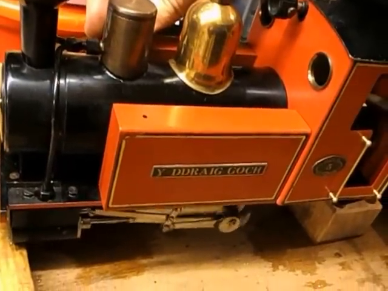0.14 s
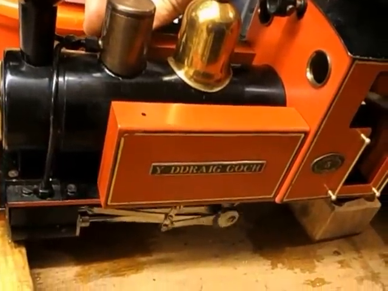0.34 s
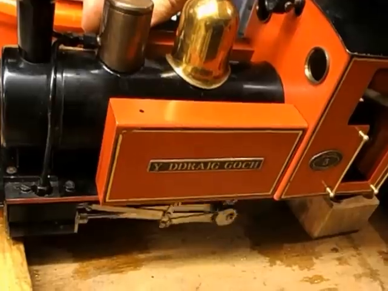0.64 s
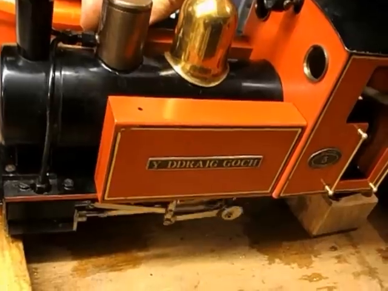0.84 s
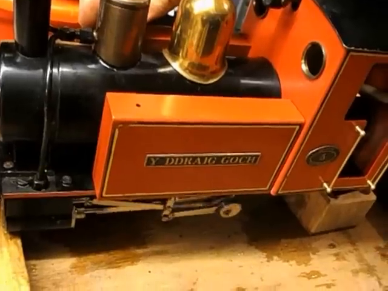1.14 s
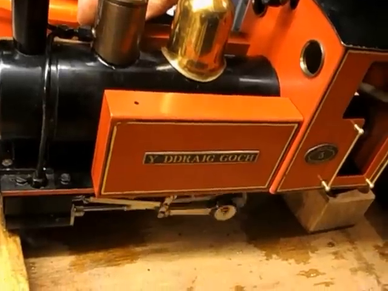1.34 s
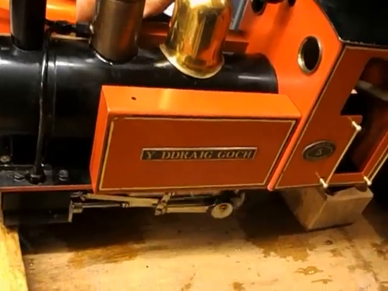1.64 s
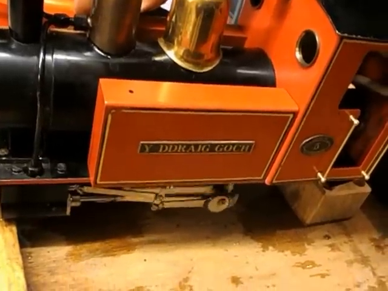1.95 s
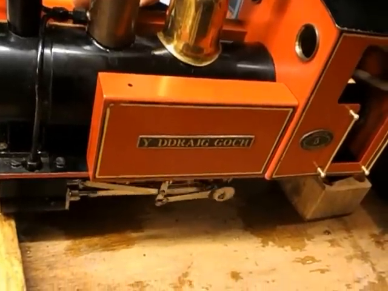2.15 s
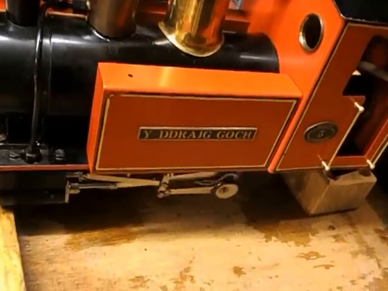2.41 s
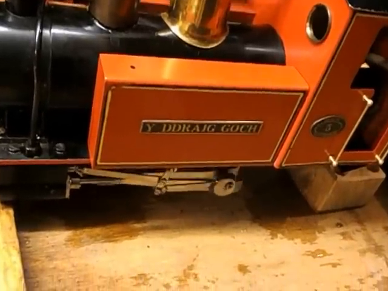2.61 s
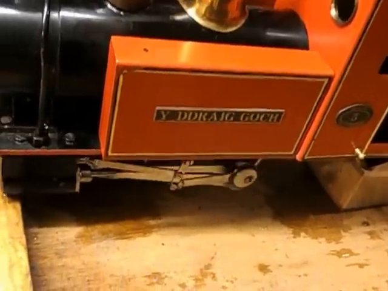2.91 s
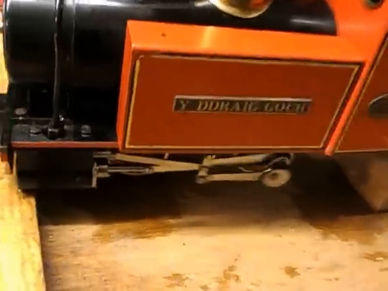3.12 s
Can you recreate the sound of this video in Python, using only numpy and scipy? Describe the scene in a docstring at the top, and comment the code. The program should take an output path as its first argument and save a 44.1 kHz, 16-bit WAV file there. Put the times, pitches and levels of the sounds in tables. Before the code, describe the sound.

Small gas-fired steam engine hissing steadily close up, with light metallic ticks and one hard snap

```python
"""Model steam locomotive at tick-over

A small gas-fired engine runs on a workbench, close to the microphone. Shaped noise makes the burner's roar,
its flue resonances, the steam and the gas jet; a bright band sweeps through the hiss near the end.
Struck modes make the ticks of the loose rods and the knocks of the frames, about three a second.
A hard snap and a brass clink stand out; the snap makes the limiter duck everything for a moment."""
import sys
import numpy as np
from scipy import signal
from scipy.fft import rfft, irfft, next_fast_len
from scipy.io import wavfile
from scipy.ndimage import uniform_filter1d, minimum_filter1d, map_coordinates

SR = 44100
rng = np.random.default_rng(int(sys.argv[2]) if len(sys.argv) > 2 else 0)


def persist_wave(psi):
    """Save psi, clipped to +-1, as 16-bit WAV."""
    counts = np.round(np.clip(psi, -1, 1) * 32767).astype(np.int16)
    wavfile.write(sys.argv[1], SR, np.atleast_2d(counts).T)


N = 144207  # samples


def amp(db):
    """Decibels to gain."""
    return 10 ** (np.asarray(db) / 20)


def unit(x):
    """Scale to rms 1."""
    return x / np.sqrt(np.mean(x ** 2) + 1e-20)


def along(points, hz):
    """Read (Hz, value) points on a log frequency axis."""
    point_hz, value = np.transpose(points)
    return np.interp(np.log(hz + 1), np.log(point_hz + 1), value)


def curves(rows, t):
    """Read each column after the time at times t; the ends hold."""
    row_s, *columns = np.transpose(rows)
    return [np.interp(t, row_s, column) for column in columns]


def wobble(knots_per_s):
    """Smooth random curve through normally distributed knots."""
    knots = rng.standard_normal(int(N * knots_per_s / SR) + 4)
    return map_coordinates(knots, [np.arange(N) * knots_per_s / SR])


def filtered(x, response):
    """Multiply the spectrum of x by a response of frequency."""
    size = next_fast_len(len(x) + 8192)
    spectrum = rfft(x, size) * response(np.fft.rfftfreq(size, 1 / SR))
    return irfft(spectrum, size)[:len(x)]


def noise(response):
    """Coloured noise of rms 1."""
    return unit(filtered(rng.standard_normal(N), response))


def coloured_noise(colour):
    """Noise of rms 1 that follows a (Hz, dB) colour table."""
    return noise(lambda f: amp(along(colour, f)))


def add(track, start_s, x):
    """Mix x into the track from start_s."""
    part = track[round(start_s * SR):][:len(x)]
    part += x[:len(part)]


def strike(modes, contact_s, soft_hz):
    """Decaying modes rung by a short, low-passed scraping contact; peak 1."""
    t = np.arange(SR // 8) / SR
    scrape = rng.standard_normal(len(t)) * np.exp(-(t / contact_s) ** 2)
    force = np.diff(scrape, prepend=0)
    soften = signal.butter(4, min(soft_hz, SR / 3), fs=SR, output="sos")
    force = signal.sosfilt(soften, force)
    ring = 0
    for pitch_hz, level_db, t60_s in modes:
        decaying_sine = np.sin(2 * np.pi * pitch_hz * t) * 1e3 ** (-t / t60_s)
        mode = signal.fftconvolve(force, decaying_sine)[:len(t)]
        varied_db = level_db + rng.standard_normal()  # each strike differs
        ring = ring + amp(varied_db) * unit(mode)
    return ring / np.abs(ring).max()


# burner roar, relative spectral density: freq_hz [Hz], level_db [dB]
ROAR_COLOUR = [(25, -17), (60, -24.5), (150, -14.5), (250, -1.5), (400, -1), (600, 0), (720, -7.5),
               (950, -10.5), (1180, -18), (1550, -6), (1800, -11.5), (2200, -22.5), (2650, -22),
               (3200, -11), (3600, -17.5), (6000, -34)]
# flue resonances: pitch_hz [Hz], width_hz [Hz], rms_db [dB before fade]
FLUE_RESONANCES = [(297, 65, -39.5), (487.6, 65, -35.5), (592.6, 22, -34), (1399, 82, -30.5),
                   (2977, 73, -39)]
ROAR_RMS_DB, ROAR_FLUTTER_DB, ROAR_FLUTTER_KNOTS_PER_S = -31, 0.25, 24.9
# upper resonances recede as the microphone moves
FLUE_FADE_START_S, FLUE_FADE_DB_PER_S, FLUE_FADE_ABOVE_HZ = 2.74, 10.5, 1000


def burner(t):
    """Flame turbulence gives a fluttering broad roar; the flue adds resonant bands."""
    roar_db = ROAR_RMS_DB + ROAR_FLUTTER_DB * wobble(ROAR_FLUTTER_KNOTS_PER_S)
    out = amp(roar_db) * coloured_noise(ROAR_COLOUR)
    fade_db = FLUE_FADE_DB_PER_S * np.maximum(t - FLUE_FADE_START_S, 0)
    for pitch_hz, width_hz, rms_db in FLUE_RESONANCES:
        def response(f):
            resonance = f * width_hz / (pitch_hz ** 2 - f * f + 1j * f * width_hz)
            skirt = np.exp(-((f - pitch_hz) / (2.2 * width_hz)) ** 2)
            return resonance * skirt

        band = noise(response)
        out += amp(rms_db - fade_db * (pitch_hz > FLUE_FADE_ABOVE_HZ)) * band
    return out


# steam flow, eases off then opens at once: time_s [s], level_db [dB re STEAM_DB]
STEAM_FLOW = [(0, -4.3), (.42, -3.5), (.6, -5), (.76, -12), (.9, -17), (1.195, -10), (1.22, -1), (1.42, .3),
              (1.8, -.7), (2.7, -.3), (2.95, -1.3), (3.27, .3)]
# steam, relative spectral density: freq_hz [Hz], level_db [dB]
STEAM_COLOUR = [(1500, -32), (2600, -30), (3600, -24), (4050, -13), (4550, -8.5), (4800, -11), (5200, -3.5),
                (5850, 0.5), (6080, -3.5), (6450, -3), (7000, -9.5), (7450, -12.5), (8350, 3), (9100, -3.5),
                (10000, -7.5), (11000, -25.5), (12200, -19), (13300, -32), (14000, -45)]
STEAM_DB, STEAM_FLUTTER_DB, STEAM_SPUTTER_DB = -20.5, -0.05, 0.53


def steam(t):
    """Turbulent steam: coloured noise following the flow, with slow flutter and fast sputter."""
    flow_db, = curves(STEAM_FLOW, t)
    flutter_db = STEAM_FLUTTER_DB * wobble(26)
    sputter_db = STEAM_SPUTTER_DB * wobble(300)
    return amp(STEAM_DB + flow_db + flutter_db + sputter_db) * coloured_noise(STEAM_COLOUR)


# gas jet, relative spectral density: freq_hz [Hz], level_db [dB]
JET_COLOUR = [(1500, -27), (2600, -18.5), (3600, -14.5), (4050, -2), (4800, -4.5), (5250, 5), (6100, 1.5),
              (7000, -7.5), (8400, 3), (9100, 3.5), (10000, -8), (11000, -10.5), (12000, -18), (13000, -32),
              (14000, -45)]
JET_DB = -27.5


def gas_jet():
    """Steady turbulence of the gas jet: coloured noise at constant level."""
    return amp(JET_DB) * coloured_noise(JET_COLOUR)


# band with opposite dips on both sides: time_s [s], centre_hz [Hz], depth_db [dB, negative inverts]
BAND_SWEEP = [(2.55, 7180, 11.5), (2.74, 6930, 9.5), (2.86, 6230, 8), (2.95, 5500, 4), (3.04, 4900, 3),
              (3.14, 5450, -1), (3.27, 6400, 7)]
SWEEP_WIDTH_HZ, SWEEP_SPACING_HZ = 990, 3910
HISS_PATCHY_RMS_DB = 1.22


def hiss(t):
    """Steam and jet share random time-frequency patches and one moving spectral ripple."""
    freq_hz, frame_s, spectra = signal.stft(steam(t) + gas_jet(), SR, nperseg=512)
    patches = rng.standard_normal(spectra.shape)
    patches = uniform_filter1d(patches, size=6, axis=0)
    patches = unit(uniform_filter1d(patches, size=14, axis=1))
    centre_hz, depth_db = curves(BAND_SWEEP, frame_s)
    off_hz = freq_hz[:, None] - centre_hz
    ripple = np.cos(2 * np.pi * off_hz / SWEEP_SPACING_HZ)
    window = np.exp(-.5 * (off_hz / SWEEP_WIDTH_HZ) ** 2)
    gain_db = depth_db * ripple * window + HISS_PATCHY_RMS_DB * patches
    return signal.istft(spectra * amp(gain_db), nperseg=512)[1][:N]


# rod ticks: start_s [s], peak_db [dB before TICK_GAIN_DB], treble_db [dB above TICK_SPLIT_HZ]
ROD_TICKS = [(0.093, -23, -7.5), (0.1618, -10.5, -5), (0.3628, -16.5, -1), (.394, -23, 0),
             (0.4286, -9, -4.5), (0.6682, -9.5, 1), (.7053, -21.5, -11), (0.9602, -16, 2),
             (1.0015, -21.5, -16), (1.2569, -20, 7), (1.3041, -20, -13), (1.5232, -19.5, -8),
             (1.5923, -18, -9), (1.934, -17.5, -1), (2.2817, -15, -7), (2.625, -16.5, -4),
             (2.975, -15.5, -5)]
# rod modes before treble and random variation: pitch_hz [Hz], level_db [dB relative], t60_s [s]
ROD_MODES = [(1730, -7.5, .016), (2000, 3, 0.026), (2340, -1, 0.031), (2620, -12.5, 0.011),
             (2780, 0, 0.018), (3110, 7, 0.036), (3720, -8, 0.013), (4080, -21, .018), (4550, -16, .018)]
TICK_GAIN_DB, TICK_CONTACT_S, TICK_SOFT_HZ, TICK_SPLIT_HZ = 3.5, 0.0029, 5000, 2770


def rods():
    """Play in the running gear makes the rods tick: short contacts ring their modes."""
    out = np.zeros(N)
    for start_s, peak_db, treble_db in ROD_TICKS:
        modes = [
            (pitch_hz, level_db + treble_db * (pitch_hz > TICK_SPLIT_HZ), t60_s)
            for pitch_hz, level_db, t60_s in ROD_MODES
        ]
        tick = strike(modes, TICK_CONTACT_S, TICK_SOFT_HZ)
        add(out, start_s, amp(peak_db + TICK_GAIN_DB) * tick)
    return out


# dull knocks: start_s [s], peak_db [dB]
FRAME_KNOCKS = [(.077, -18.5), (.351, -18), (.901, -21.5), (1.201, -25), (1.502, -23), (1.813, -23.5),
                (2.163, -19), (2.503, -18.5), (2.859, -21.5), (3.207, -19)]
# frame modes before random variation: pitch_hz [Hz], level_db [dB relative], t60_s [s]
FRAME_MODES = [(773, -4, 0.04), (852, 2, 0.051), (1790, -7, .018), (2320, -5.5, 0.028)]
KNOCK_CONTACT_S, KNOCK_SOFT_HZ = 0.006, 2500


def frames():
    """Play in the running gear knocks the frames: longer, softer contacts ring lower modes."""
    out = np.zeros(N)
    for start_s, peak_db in FRAME_KNOCKS:
        add(out, start_s, amp(peak_db) * strike(FRAME_MODES, KNOCK_CONTACT_S, KNOCK_SOFT_HZ))
    return out


# cracks of one snap, with its rebound: start_s [s], peak_db [dB before limiting]
SNAP_CRACKS = [(0.6127, 3.5), (.6138, 16), (.6178, 1)]
# crack, relative spectral density: freq_hz [Hz], level_db [dB]
CRACK_COLOUR = [(100, -16), (1000, -9), (2600, -11.5), (4500, -9.5), (6500, 4), (10300, -2), (13000, -22),
                (15000, -44)]
SNAP_T60_S, SNAP_TAIL_DB, SNAP_TAIL_T60_S = 0.0058, -11.5, 0.046  # tail re fast decay
THUMP_HZ, THUMP_DB, THUMP_RISE_S, THUMP_T60_S = 228, 5, .003, 0.026  # level before envelope


def snap(t):
    """Hard snap by the microphone: noise with a two-stage decay over a low decaying sine."""
    out = np.zeros(N)

    def decay(t60_s):
        return amp(-60 * t / t60_s)

    envelope = decay(SNAP_T60_S) + amp(SNAP_TAIL_DB) * decay(SNAP_TAIL_T60_S)
    for start_s, peak_db in SNAP_CRACKS:
        crack = coloured_noise(CRACK_COLOUR) * envelope
        add(out, start_s, amp(peak_db) * crack / np.abs(crack).max())
    thump = np.sin(2 * np.pi * THUMP_HZ * t) * decay(THUMP_T60_S)
    thump *= 1 - np.exp(-t / THUMP_RISE_S)
    add(out, SNAP_CRACKS[0][0], amp(THUMP_DB) * thump)
    return out


# brass modes before random variation: pitch_hz [Hz], level_db [dB relative], t60_s [s]
BRASS_MODES = [(1400, -8.5, 0.032), (3010, -14, 0.021), (3290, -2, 0.0088), (5140, -1, 0.024),
               (5750, 1, 0.015), (6550, -9, 0.0091), (7000, -19, .01), (8450, -16, .013)]
CLINK_START_S, CLINK_PEAK_DB = .7112, 3  # peak before limiting
CLINK_CONTACT_S, CLINK_SOFT_HZ = 0.0021, 7000


def clink():
    """A brief contact rings bright brass modes."""
    out = np.zeros(N)
    ring = strike(BRASS_MODES, CLINK_CONTACT_S, CLINK_SOFT_HZ)
    add(out, CLINK_START_S, amp(CLINK_PEAK_DB) * ring)
    return out


def scene():
    """All sources sum at one microphone; both channels are alike."""
    t = np.arange(N) / SR
    mono = burner(t) + hiss(t) + rods() + frames() + snap(t) + clink()
    return np.tile(mono, (2, 1))


NOTCH_HZ, NOTCH_HALF_WIDTH_HZ, NOTCH_DB = 7680, 120, -15.5
LIMIT_DB, HOLD_S, RELEASE_DB_PER_S = 1.5, 0.043, 290
CLIP_DB, LOW_CUT_HZ, TOP_HZ = -1.2, 78, 13930


def record(dry):
    """Microphone-port notch, hold-and-release limiter, soft clip, low cut and band limit."""
    def notch(f):
        return amp(NOTCH_DB / (1 + ((f - NOTCH_HZ) / NOTCH_HALF_WIDTH_HZ) ** 2))

    x = filtered(dry[0], notch)
    needed_db = np.minimum(LIMIT_DB - 20 * np.log10(np.abs(x) + 1e-9), 0)
    half = int(HOLD_S * SR / 2)
    held_db = minimum_filter1d(needed_db, 2 * half + 1, origin=half)  # looks back only
    # gain drops at once, then recovers at a fixed slope
    rise_db = RELEASE_DB_PER_S * np.arange(N) / SR
    released_db = np.minimum.accumulate(held_db - rise_db) + rise_db
    x = x * amp(uniform_filter1d(released_db, size=8))
    x = x / (1 + (x / amp(CLIP_DB)) ** 6) ** (1 / 6)
    low_cut = signal.butter(2, LOW_CUT_HZ, "high", fs=SR, output="sos")
    x = signal.sosfilt(low_cut, x)
    limited = filtered(x, lambda f: 1 / np.sqrt(1 + (f / TOP_HZ) ** 240))
    return np.tile(limited, (2, 1))


dry = scene()
out = record(dry)
persist_wave(out)
```